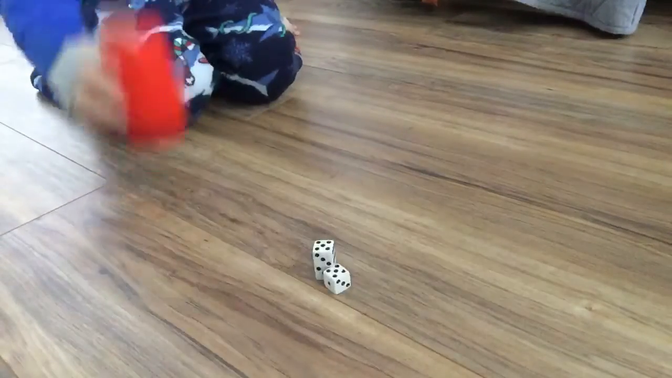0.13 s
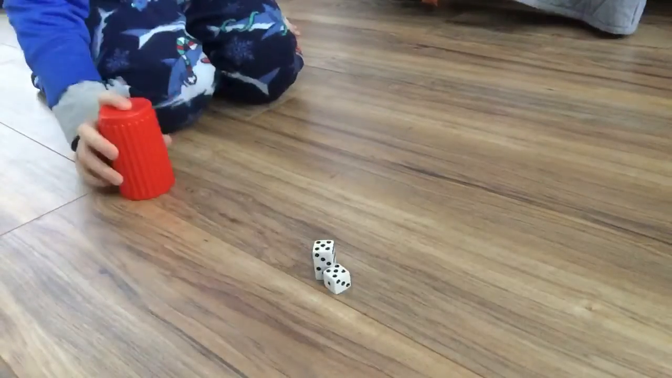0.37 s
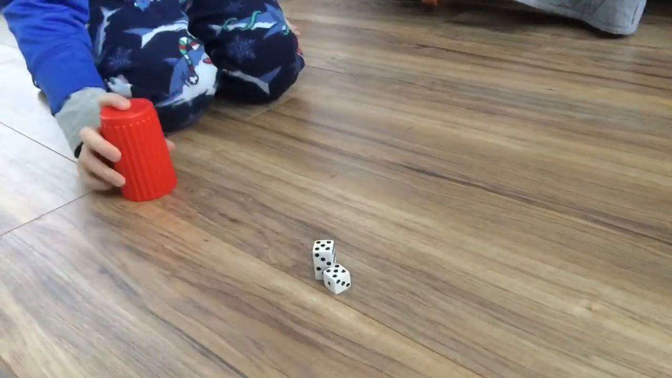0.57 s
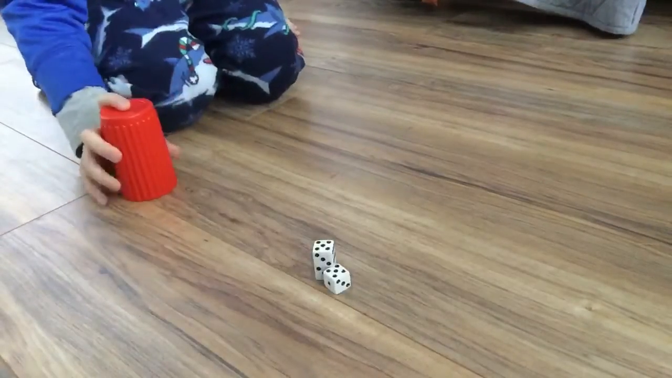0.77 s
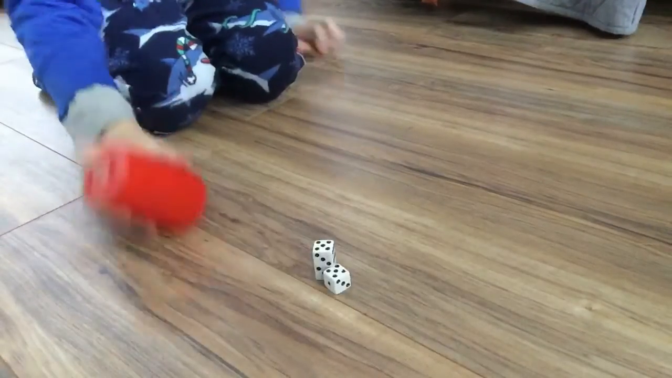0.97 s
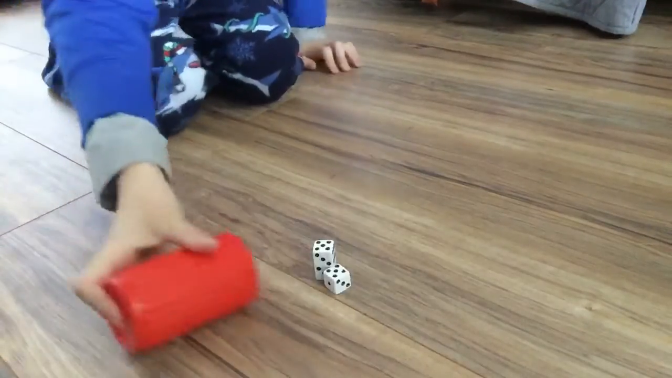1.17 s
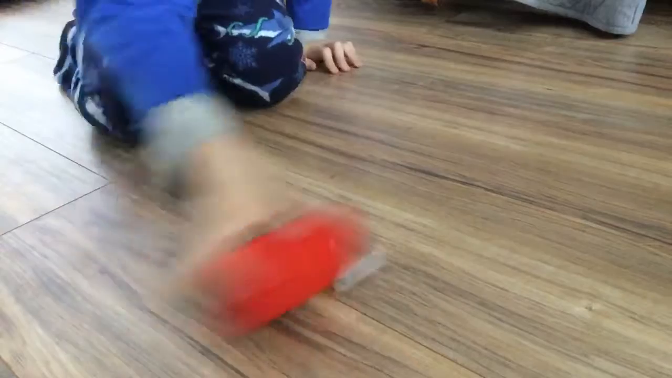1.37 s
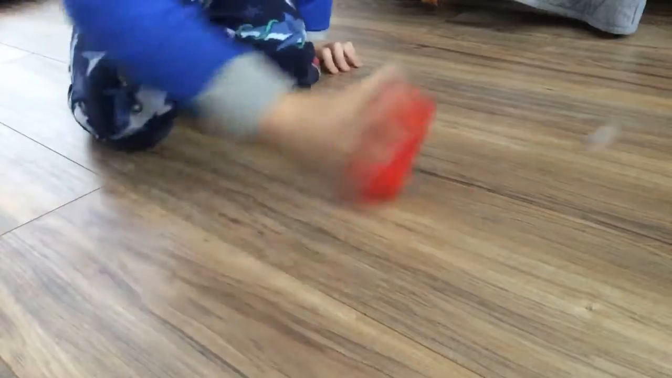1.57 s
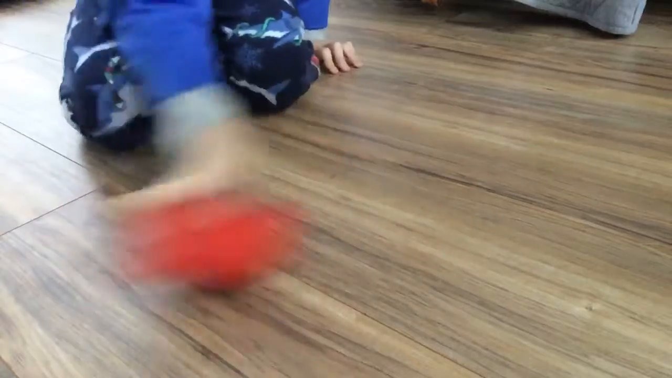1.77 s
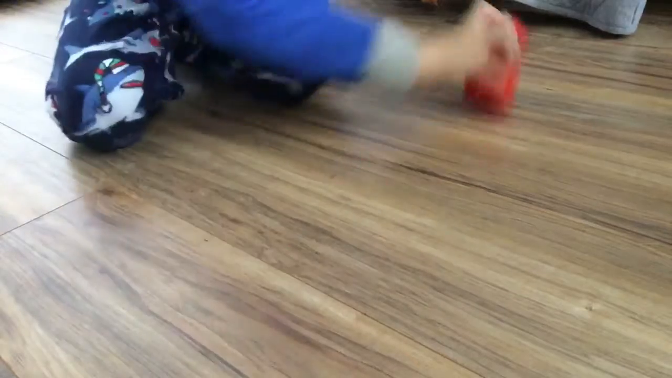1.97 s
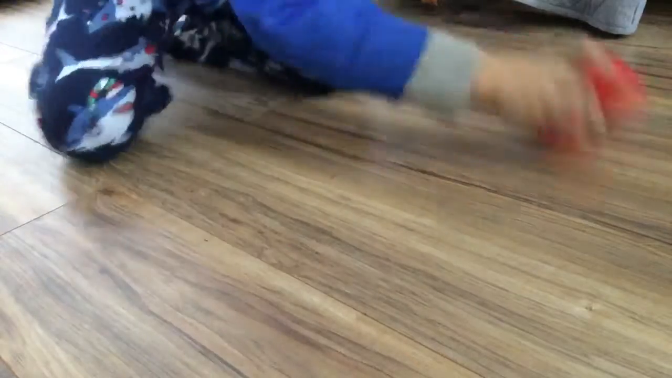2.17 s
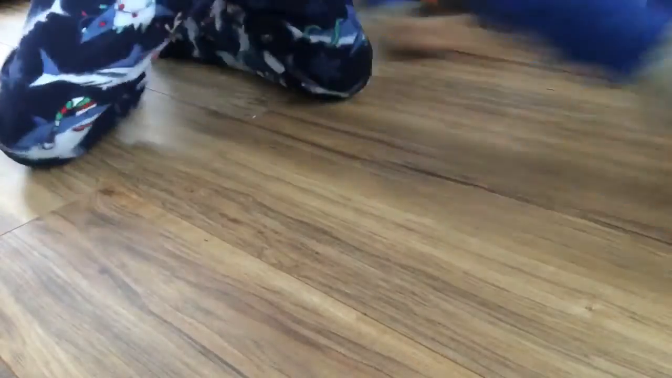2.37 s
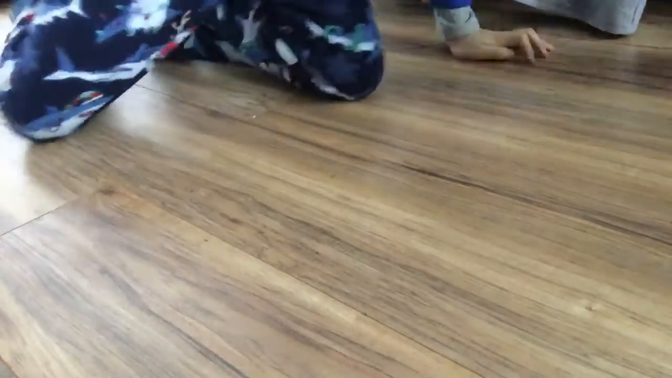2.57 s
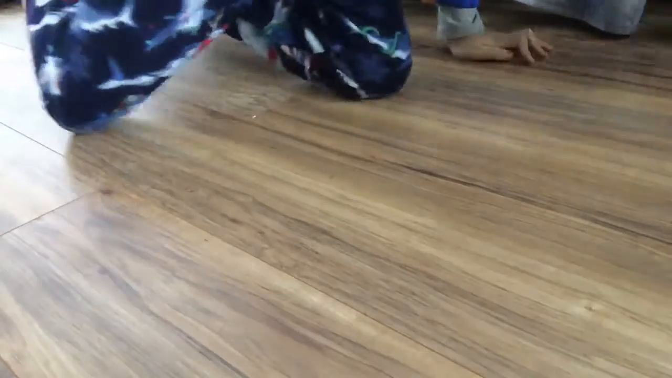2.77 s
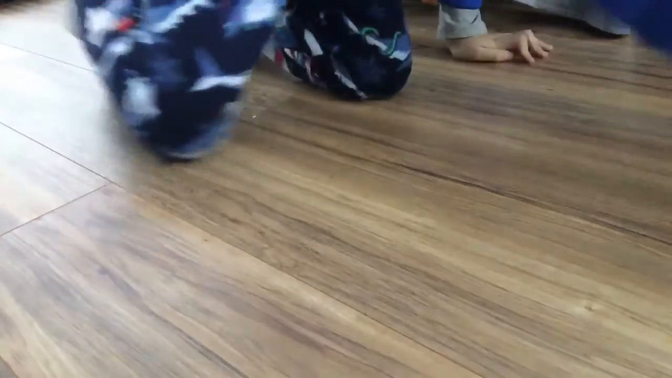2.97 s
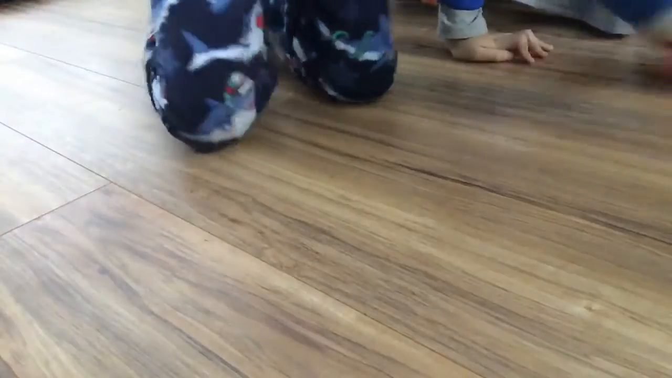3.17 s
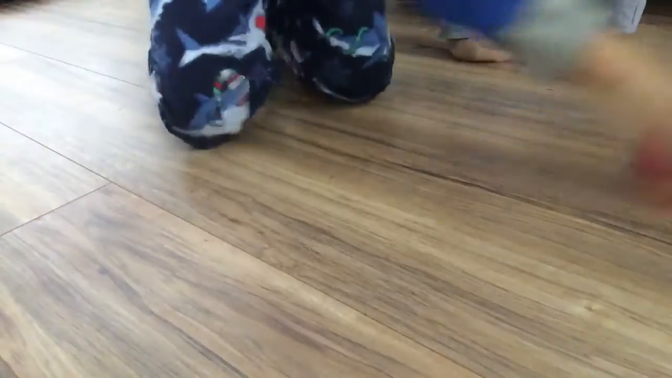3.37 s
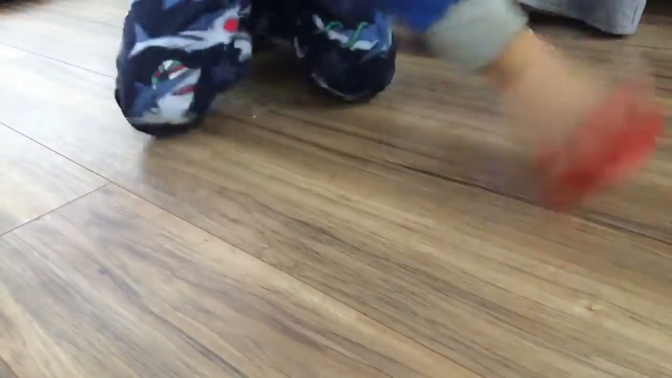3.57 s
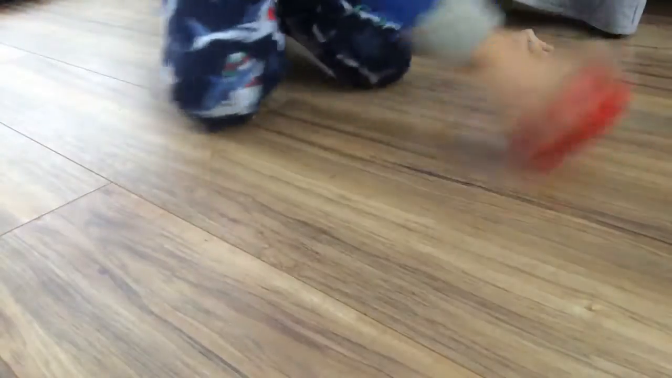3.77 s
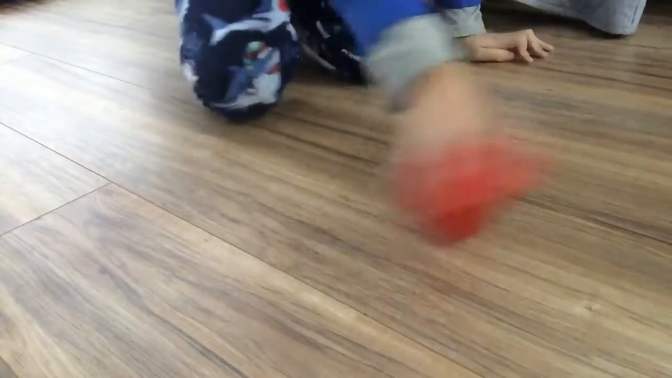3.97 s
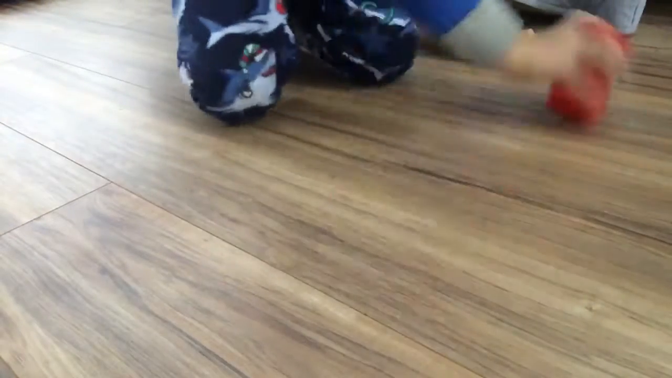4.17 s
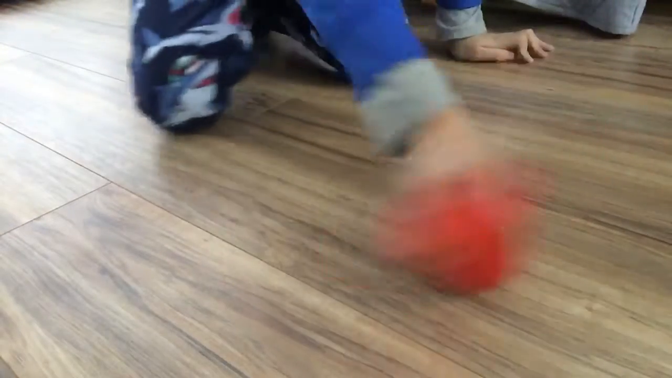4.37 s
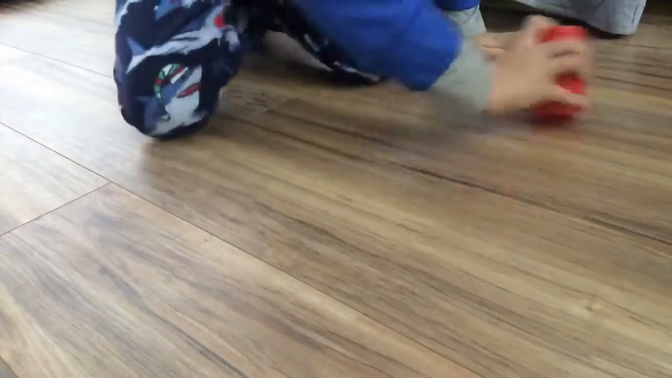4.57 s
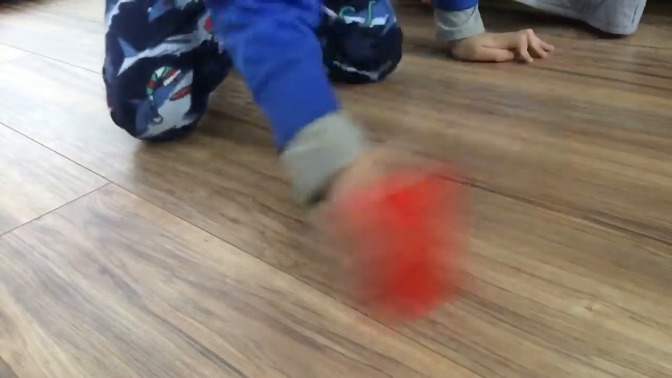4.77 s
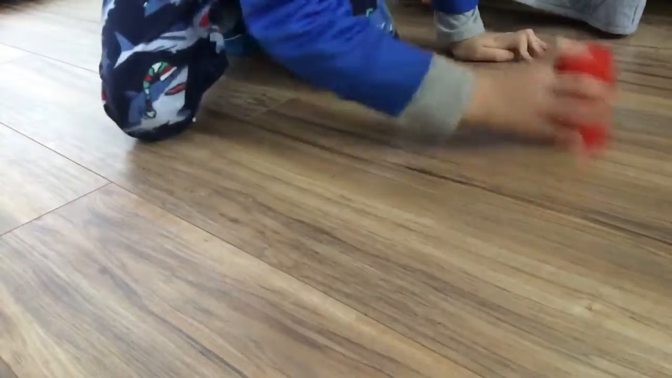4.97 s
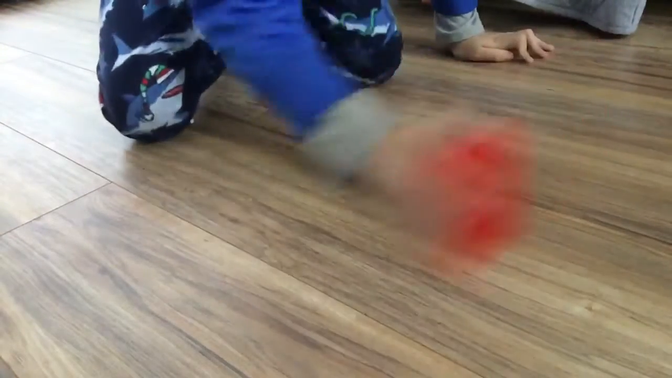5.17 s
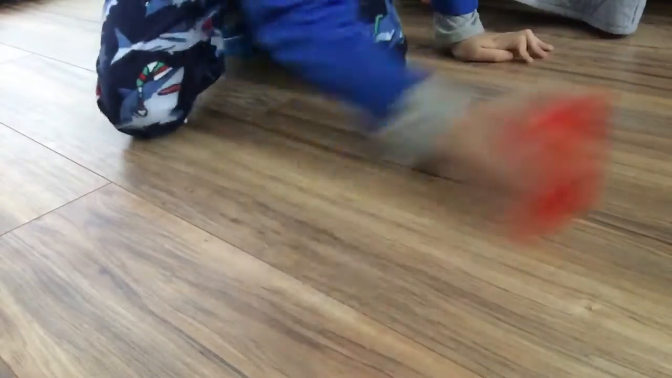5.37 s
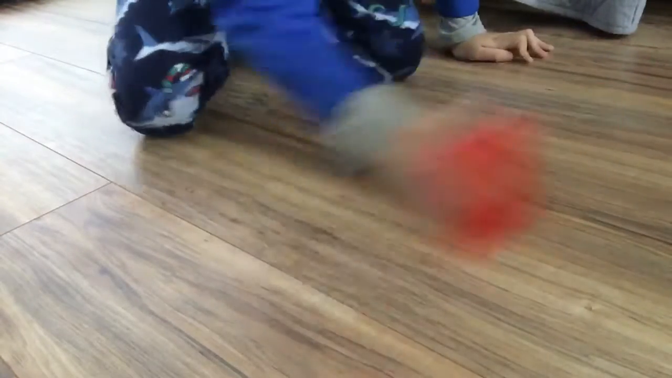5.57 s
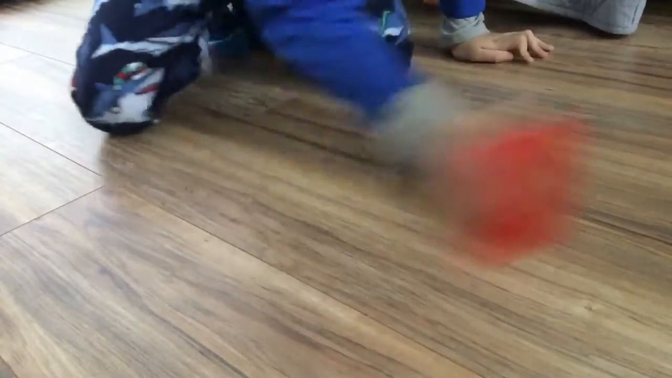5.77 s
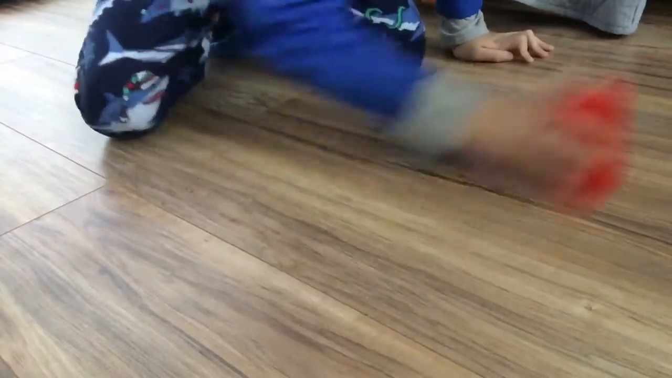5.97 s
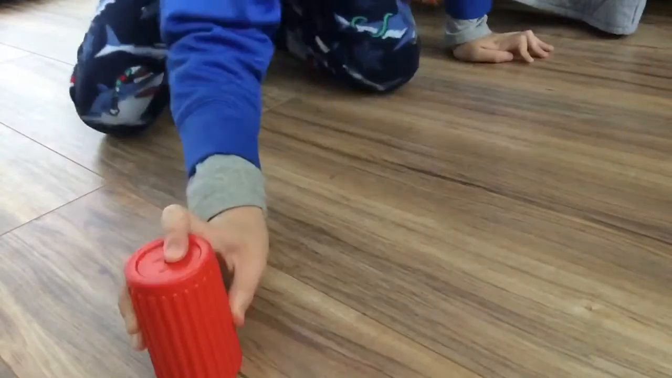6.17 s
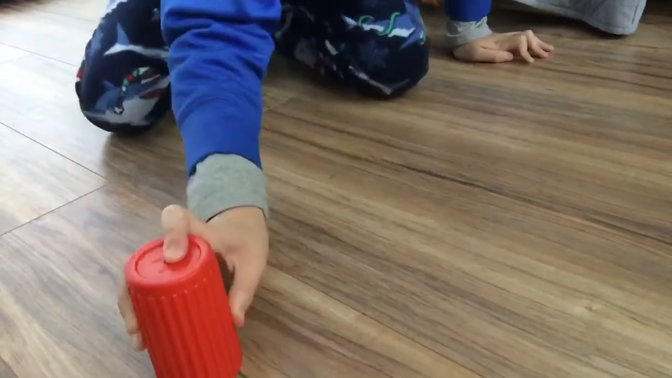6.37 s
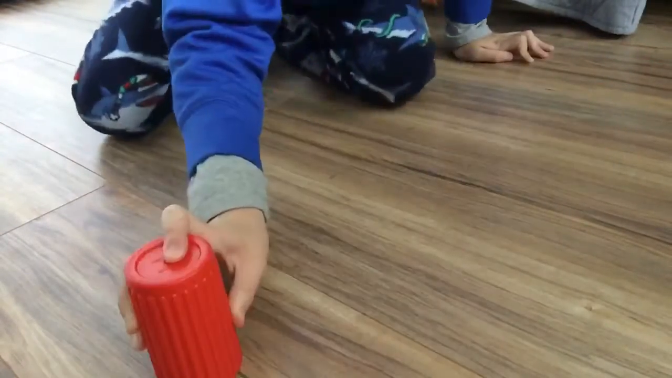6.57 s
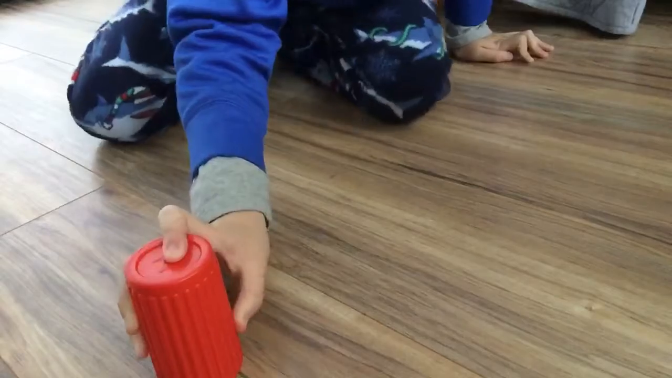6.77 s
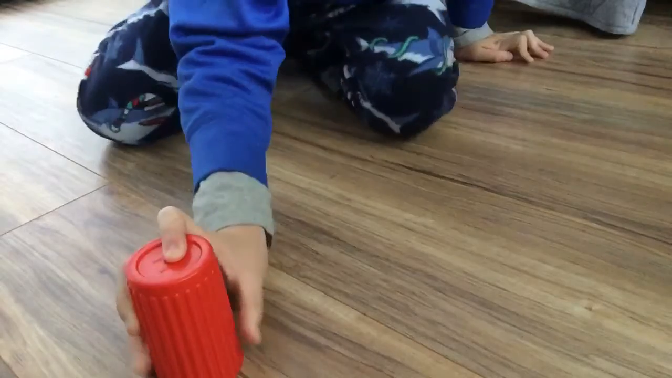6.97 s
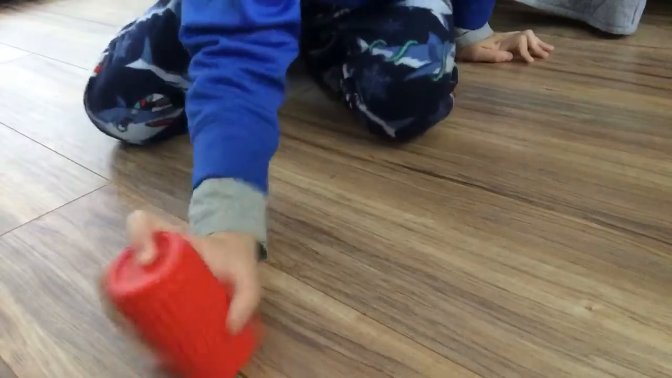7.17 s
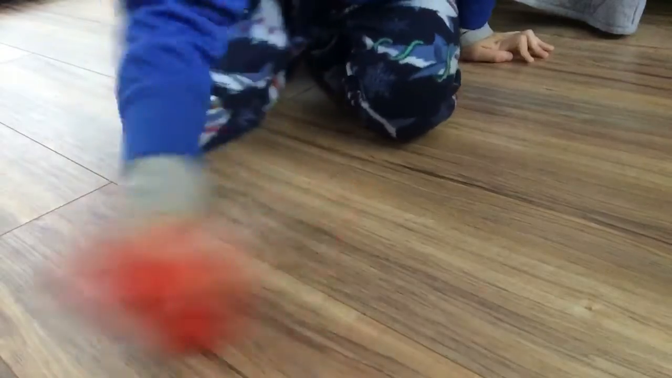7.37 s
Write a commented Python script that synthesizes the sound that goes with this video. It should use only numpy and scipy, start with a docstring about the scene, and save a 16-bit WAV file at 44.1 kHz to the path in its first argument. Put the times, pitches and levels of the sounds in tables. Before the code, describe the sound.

Close in a small quiet room, a hollow plastic cup knocks on floorboards. After a pause it slides lightly, then snaps up dice with a hard click. Rapid back-and-forth strokes follow, scraping, hissing and hooting hollowly while dice whirl against the plastic wall, with knocks at the turns. The cup stops, dice clatter together, near silence follows, and a new sweep begins.

```python
"""A wooden floor in a small room: an upturned plastic cup is swept to and fro and scoops up dice.
Its rim scrapes, hisses and rumbles on the boards: tiny random impacts, coloured and driven by the strokes.
Dice whirl round the wall (impacts ringing their modes) and the air inside hoots (modes gliding in pitch).
Floor knocks and dice hits ring floor, air, wall and dice, with a crack of noise.
The cup stops, the dice clatter into a stack, and it sets off again; decaying noise forms the room's answer."""
import sys
import numpy as np
from scipy import signal
from scipy.fft import rfft, irfft, next_fast_len
from scipy.io import wavfile
from scipy.ndimage import uniform_filter1d, map_coordinates

SR = 44100
rng = np.random.default_rng(int(sys.argv[2]) if len(sys.argv) > 2 else 0)


def to_wav(s):
    """Save 16-bit WAV."""
    ch = np.atleast_2d(s).T  # columns
    pcm = np.round(np.clip(ch, -1, 1) * 32767)  # PCM
    wavfile.write(sys.argv[1], SR, pcm.astype(np.int16))


N = 327663


def amp(db):
    """Decibels to gain."""
    return 10 ** (np.asarray(db) / 20)


def unit(x):
    """Scale to rms 1."""
    return x / np.sqrt(np.mean(x ** 2) + 1e-20)


def burst(x):
    """Scale a short sound to the energy of 20 ms at rms 1."""
    return x * np.sqrt(0.02 * SR / np.sum(x ** 2))


def along(points, hz):
    """Interpolate (Hz, value) points on a log frequency axis."""
    point_hz, values = np.transpose(points)
    return np.interp(np.log(hz + 1), np.log(point_hz + 1), values)


def wobble(rate):
    """A smooth random curve, rate knots a second."""
    knots = rng.standard_normal(int(N * rate / SR) + 4)
    return map_coordinates(knots, [np.arange(N) * rate / SR])


def contacts(rate, spread_db):
    """Tiny random impacts, on average rate a second, of random sign and uneven size."""
    hits = rng.random(N) < rate / SR
    sign = rng.choice([-1, 1], N)
    return hits * sign * amp(spread_db * rng.standard_normal(N))


def filtered(x, response):
    """Multiply the spectrum of x by a complex response of frequency."""
    m = next_fast_len(len(x) + SR // 10)
    return irfft(rfft(x, m) * response(np.fft.rfftfreq(m, 1 / SR)), m)[:len(x)]


def coloured(x, spectrum):
    """Shape x with a smooth spectrum."""
    return filtered(x, lambda hz: amp(along(spectrum, hz)))


def skirts(hz, modes):
    """A body radiates little outside the range of its modes."""
    edges_hz = np.clip([modes[0][0] * 0.87, modes[-1][0] * 1.24], 20, SR / 2 - 1)
    band = signal.butter(2, edges_hz, 'band', fs=SR, output='sos')
    return signal.sosfreqz(band, hz, fs=SR)[1]


def ringing(x, modes):
    """Excite a body: a parallel bank of damped resonances, limited to its range."""
    def response(hz):
        bank = sum(amp(db) * 1j * hz * width / (centre * centre - hz * hz + 1j * hz * width)
                   for centre, width, db in modes)
        return bank * skirts(hz, modes)
    return filtered(x, response)


# Spectrum of the quiet room. Each row: frequency in Hz, relative level in dB.
QUIET_SPECTRUM = [(25, -19), (100, -7.5), (145, 9.5), (300, -8), (1000, -22.5), (4000, -33.5), (16000, -54)]


def quiet_room():
    """The faint steady noise of the room: coloured Gaussian noise."""
    return amp(-77.5) * unit(coloured(rng.standard_normal(N), QUIET_SPECTRUM))


# Decay of the room. Each row: frequency in Hz, time to fall 60 dB in seconds.
ROOM_DECAY = [(150, 0.3), (400, 0.2), (1000, 0.35), (4000, 0.36), (8000, 0.28), (15000, 0.17)]


def room(x, wet_db):
    """Add the room's answer: noise dying at its own speed per frequency, drawn afresh every 1/3 s."""
    out = np.pad(x, (0, SR))
    size = SR // 3  # samples per new tail
    for start in range(0, N, size):
        hz, t, noise = signal.stft(rng.standard_normal(SR // 2), SR, nperseg=256)
        decay = amp(-60 * t / along(ROOM_DECAY, hz)[:, None])
        tail = signal.istft(noise * decay, SR, nperseg=256)[1]
        tail[:round(0.005 * SR)] = 0  # gap before the first reflection
        echo = signal.fftconvolve(x[start:start + size], tail / np.linalg.norm(tail))
        out[start:start + len(echo)] += amp(wet_db) * echo
    return out[:N]


def mirrored(x, share, delay_s, swing, rate):
    """Add a bounce off floor and hand, whose path keeps changing at random."""
    lag_s = delay_s * np.exp(swing * wobble(rate))
    return x + share * map_coordinates(x, [np.arange(N) - SR * lag_s], order=3)


# Strokes of the cup, or parts of them, and one faint rustle of sleeve or hand near 6.7 s.
# Each row: start in seconds, length in seconds, share of the length at which it is fastest,
# top speed 0-1, force in dB, dice drive in dB over the force, air drive in dB over the force.
STROKES = [(0.847, 0.087, 0.71, 0.1, -73.5, -15, 9.5), (0.931, 0.11, 0.42, 0.77, -53, 4, 8),
           (1.119, 0.138, 0.22, 0.3, -38, -5.5, -0.5), (1.256, 0.3, 0.1, 0, -48.5, -15, 4.5),
           (1.463, 0.271, 0.25, 0.5, -26, 1, -3.0), (1.733, 0.12, 0.6, 0.69, -27.5, -1.5, 2.5),
           (1.872, 0.17, 0.71, 0.55, -24.0, 1.5, -4.5), (2.051, 0.13, 0.29, 0.8, -29.5, 4.5, 6),
           (2.196, 0.075, 0.51, 0.2, -36.0, -7, 8.5), (2.268, 0.167, 0.41, 0.9, -30.5, 1, -0.5),
           (2.448, 0.29, 0.27, 0.6, -29.5, 1.5, -2.5), (2.74, 0.075, 0.3, 0.5, -39.5, 5, -15),
           (2.814, 0.181, 0.85, 0.44, -31.5, 0.5, 8), (2.993, 0.34, 0.13, 0.71, -31, 0.5, 4.0),
           (3.293, 0.099, 0.36, 0.67, -27, -2.0, 0.5), (3.399, 0.25, 0.72, 0.6, -27, -2, 1.5),
           (3.632, 0.105, 0.29, 0.35, -28.5, -1.5, 3), (3.735, 0.12, 0.48, 0.75, -30.0, -1.5, 2.5),
           (3.862, 0.075, 0.5, 0.2, -35.0, 0, 8), (3.936, 0.19, 0.4, 0.6, -28.5, -4, 2.5),
           (4.127, 0.242, 0.45, 0.74, -28.5, 2.5, 1), (4.376, 0.11, 0.44, 0.74, -24.5, -2, -1),
           (4.508, 0.23, 0.71, 0.4, -27.5, -2, 3.5), (4.745, 0.21, 0.76, 0.96, -27.0, 5.5, -7.5),
           (4.965, 0.26, 0.56, 0.73, -27.5, 2.0, -5), (5.187, 0.23, 0.5, 0.88, -27.5, 3.5, -3.5),
           (5.414, 0.2, 0.85, 0.5, -26.5, 2.5, -3.5), (5.617, 0.25, 0.84, 0.8, -26.5, 5.0, -3),
           (5.84, 0.24, 0.5, 0.7, -28, 3.5, -1.5), (6.066, 0.22, 0.75, 0.8, -24.5, 4, -7),
           (6.293, 0.17, 0.1, 0.1, -46, -2, -1), (6.71, 0.532, 0.41, 0.05, -68.5, -5.0, 9),
           (7.233, 0.063, 0.94, 0.1, -47, -19, 5), (7.284, 0.27, 0.35, 0.5, -29, 0.5, 9.5)]
TURN_S = 0.016  # blend of one row into the next
STROKE_POINT = 1.13  # 1 = sine arch, higher = more pointed


def strokes():
    """Each row speeds up and slows down: slowness 0-1, speed, drives of rim, dice and air."""
    controls = np.zeros((5, N + SR))
    controls[0] = 1
    for s, length_s, fastest, top_speed, force_db, dice_db, air_db in STROKES:
        u = np.linspace(0, 1, round(length_s * SR))
        phase = np.interp(u, [0, np.clip(fastest, 0.05, 0.95), 1], [0, 0.5, 1])
        arc = np.abs(np.sin(np.pi * phase)) ** STROKE_POINT
        start = round(s * SR)
        span = slice(start, start + len(u))
        controls[:2, span] = 1 - arc, top_speed * arc
        controls[2:, span] = amp([[force_db], [force_db + dice_db], [force_db + air_db]])
    return uniform_filter1d(controls, round(TURN_S * SR), axis=1)[:, :N]


# Spectrum of the boards. Each row: frequency in Hz, relative level in dB.
RUMBLE_SPECTRUM = [(30, -23.5), (110, -24.5), (175, -7), (250, 1.5), (330, 7), (420, -2), (520, -13.5),
                   (900, -43.5)]
BOARDS_MAX_DB = -46.5  # soft ceiling, before bumps and trim
BOARDS_SLOW_DB, BOARDS_SPEED_DB = 3, -13.5  # drive over the force at rest, change to full speed


def board_rumble(force, speed, bumpy_db=2.5):
    """Slow dragging shakes the heavy boards, fast sliding skims them; the rumble is bumpy."""
    drag = force * amp(BOARDS_SLOW_DB + BOARDS_SPEED_DB * speed)
    limited = drag / np.hypot(1, drag / amp(BOARDS_MAX_DB))
    boards = limited * amp(bumpy_db * wobble(28))
    return amp(-2) * boards * unit(coloured(contacts(rate=900, spread_db=3.0), RUMBLE_SPECTRUM))


# Spectrum of the fast rim. Each row: frequency in Hz, relative level in dB.
HISS_SPECTRUM = [(2000, -43.5), (5000, 2.5), (7000, 4), (9000, 4), (11500, 2), (14000, -2.5), (16000, -8.5)]
HISS_SPEED_DB = 17.5  # growth from rest to full speed


def rim_hiss(force, speed):
    """Dense tiny contacts of the rim hiss louder with speed."""
    hiss = force * amp(HISS_SPEED_DB * (speed - 1))
    return amp(1.0) * hiss * unit(coloured(contacts(rate=16000, spread_db=4.5), HISS_SPECTRUM))


# Spectrum of the rim on wood. Each row: frequency in Hz, relative level in dB.
SCRAPE_SPECTRUM = [(500, -50.5), (900, -3), (1100, 3.5), (1550, -1), (2000, 2.5), (2700, 2), (3400, -6.5),
                   (6000, -6.5), (12000, -41.5)]
SCRAPE_TURN_DB = 9.5  # sinks this far at a turn


def rim_scrape(force, slowness):
    """The rim catches on the wood grain; the scrape sinks as the cup turns round."""
    scrape = force * amp(-SCRAPE_TURN_DB * slowness)
    return amp(-1.09) * scrape * unit(coloured(contacts(rate=4000, spread_db=2.5), SCRAPE_SPECTRUM))


# Resonances of the dice. Each row: frequency in Hz, width in Hz, relative level in dB.
DICE_MODES = [(3290, 400, -0.5), (3820, 510, 0), (4136, 210, 6), (4606, 360, 1), (5060, 430, -1.5),
              (5400, 320, -1.5), (5920, 180, -5.5), (6500, 250, -5.5)]
DICE_TURN_DB = 10  # sinks this far at a turn


def whirl(drive, slowness, waver_db=3.0):
    """Dice pressed to the wall tick along it; as they tumble, one mode after another speaks up."""
    lowest_hz = DICE_MODES[0][0]
    sound = np.zeros(N)
    for hz, width_hz, db in DICE_MODES:
        # lasting contact broadens the modes and dulls the upper ones
        damped = (hz, width_hz * 3.0, db - 4.5 * np.log2(hz / lowest_hz))
        ticks = contacts(rate=900, spread_db=4.5)
        sound += amp(waver_db * wobble(35)) * ringing(ticks, [damped])
    return amp(-4.0 - DICE_TURN_DB * slowness) * drive * unit(sound)


# Pitch of the air in the cup, higher as the rim tilts up. Each row: time in seconds, pitch in Hz.
AIR_PITCH = [(0.4, 621), (1.0, 630), (1.5, 717), (1.8, 712), (2.6, 718), (2.9, 693), (3.4, 767), (3.9, 763),
             (4.35, 756), (4.65, 685), (4.9, 605), (5.3, 629), (5.65, 625), (5.95, 611), (6.5, 660),
             (7.4, 644)]


def air_pitch(seconds):
    """Pitch of the enclosed air in Hz: the rim's tilt opens the cavity."""
    return np.interp(seconds, *np.transpose(AIR_PITCH))


def cavity(pitch_hz, tilt_db=8.5):
    """Modes of the air (Hz, width Hz, dB); the two low ones fade as the rim lifts."""
    tilt = (pitch_hz - 600) / 100
    return [(435, 60, -7.0 - 1.0 * tilt_db * tilt),
            (555, 62, -1.5 - 0.84 * tilt_db * tilt),
            (pitch_hz, 72, 0)]


AIR_TURN_DB = 3.5  # sinks this far at a turn


def hoot(drive, slowness, flare_db=2.53):
    """Sliding stirs the air in the cup, which flares unevenly and glides in pitch with the tilt."""
    stir = contacts(rate=1600, spread_db=4.5)
    pitch_hz = air_pitch(np.arange(N) / SR)
    centres_hz, step_hz = np.linspace(540, 840, 7, retstep=True)
    air = np.zeros(N)
    for hz in centres_hz:  # crossfade between fixed cavities
        share = np.clip(1 - abs(pitch_hz - hz) / step_hz, 0, 1)
        air += share * ringing(stir, cavity(hz))
    return amp(-4.5 - AIR_TURN_DB * slowness + flare_db * wobble(22)) * drive * unit(air)


def strike(modes, t, chatter, peak_s):
    """A blow, then noisy chatter that swells and dies, rings modes of varied pitch and strength."""
    swell = t / peak_s * np.exp(1 - t / peak_s)
    blow = chatter * swell * rng.standard_normal(len(t))
    blow[0] += 1
    chance = rng.standard_normal((len(modes), 2)) * [0.02, 3]  # pitch share, dB
    varied = [(hz * (1 + detune), width, db + extra_db)
              for (hz, width, db), (detune, extra_db) in zip(modes, chance)]
    return burst(ringing(blow, varied))


# Resonances of the floor and the cup's wall. Each row: frequency in Hz, width in Hz, relative level in dB.
FLOOR_MODES = [(189, 12, -14), (250, 74, -3.5), (307.6, 110, 11)]
WALL_MODES = [(1110, 150, -14.5), (1270, 800, -1), (1400, 270, 0.5), (1823, 140, 1.5), (2036, 350, 6.5),
              (2340, 200, -1.5), (2800, 230, -16)]
# Spectrum of the crack. Each row: frequency in Hz, relative level in dB.
CRACK_SPECTRUM = [(300, -35), (1500, -7), (5000, 5), (7500, 3), (9500, 4.5), (12000, -2.5), (16000, -10.5)]


def knock(s, floor_db, air_db, wall_db, dice_db, crack_db):
    """A knock cracks, thumps floor, air and wall, and sets the dice buzzing against the plastic."""
    t = np.arange(SR // 8) / SR
    floor = amp(floor_db - 1.5) * strike(FLOOR_MODES, t, chatter=0.0055, peak_s=0.0026)
    air = amp(air_db - 1.5) * strike(cavity(air_pitch(s)), t, chatter=0.05, peak_s=0.004)
    wall = amp(wall_db - 1.0) * strike(WALL_MODES, t, chatter=0.08, peak_s=0.0033)
    dice = amp(dice_db - 1.5) * strike(DICE_MODES, t, chatter=0.15, peak_s=0.0051)
    snap = amp(-60 * t / 0.0019) + 0.5 * amp(-60 * t / 0.07)  # first contact, then a skid
    crack = amp(crack_db) * burst(coloured(rng.standard_normal(len(t)) * snap, CRACK_SPECTRUM))
    return floor + air + wall + dice + crack


def blend(mix, share):
    """Levels in dB part way between the two columns of a mix."""
    return np.dot(mix, [1 - share, share])


# Knocks on the floor, mostly of the rim, with a few low thuds, perhaps knees. Each row: start in seconds,
# strength in dB, hardness 0-1, thump of the boards in dB.
FLOOR_KNOCKS = [(0.3992, -20, 0.48, -39.5), (0.429, -30, 0.36, -41), (1.002, -41.5, 0.12, -67),
                (1.1197, -33, 0.58, -42.5), (1.443, -36, 0.68, -49), (1.679, -23.5, 0.6, -60.0),
                (1.952, -26.5, 0.83, -47), (2.112, -21.5, 0.8, -50), (2.408, -38.0, 0.21, -42.0),
                (2.444, -28, 0.31, -39), (2.616, -38, 0.1, -39.5), (2.7757, -27.5, 1.0, -59),
                (2.849, -22.5, 0.91, -37), (3.7904, -24.5, 0.86, -43.0), (3.889, -24, 0.27, -42),
                (4.313, -17, 0.4, -38.5), (4.542, -27.5, 0.58, -53), (4.763, -18.5, 0.77, -33.0),
                (5.652, -30.5, 0.82, -58.0), (6.919, -55, 0.3, -54), (7.3046, -23.5, 0.67, -60.0),
                (7.398, -29.5, 0.69, -46.0)]
# Rows for wall, dice, crack. Each row: level over the strength in dB if soft, in dB if hard.
FLOOR_KNOCK_MIX = [(-14.5, -1.5), (-22.5, -1.5), (-42, -6)]


def floor_knocks():
    """Knocks, mostly hollow, brighten with hardness."""
    out = np.zeros(N + SR)
    for s, db, hardness, thump_db in FLOOR_KNOCKS:
        # the air takes the full strength
        wall_db, dice_db, crack_db = db + blend(FLOOR_KNOCK_MIX, hardness)
        out[round(s * SR):][:SR // 8] += knock(s, thump_db, db, wall_db, dice_db, crack_db)
    return out[:N]


# Hits of the dice. Each row: start in seconds, strength in dB, place from 0 = flat on another die
# to 1 = on the cup's edge.
DICE_HITS = [(0.4065, -34, 0.32), (1.4943, -6.5, 0.1), (1.503, -21, 0.4), (1.535, -18.5, 0.83),
             (1.5684, -17, 0.89), (1.598, -21.5, 0.72), (1.638, -18, 0.04), (1.8832, -15, 1.0),
             (1.89, -27, 0.92), (3.1288, -14, 0.64), (3.14, -15, 0.79), (3.432, -21, 0.59),
             (4.8537, -7.5, 0.35), (4.861, -31, 0.57), (5.566, -17.5, 0.39), (6.437, -43, 0.55),
             (6.467, -16.5, 0.079), (6.512, -17, 0.3), (6.5268, -24, 0.73), (6.555, -15.5, 0.05),
             (6.61, -25, 0.02), (7.364, -16, 0.08)]
# Rows for floor, air, wall, dice, crack. Each row: level over the strength in dB on a die, in dB on the edge.
DICE_MIX = [(-25.5, -30.5), (-12, -21), (-15, -3.5), (-1.5, -10.5), (-27, -4)]


def dice_hits():
    """The dice click on each other and crack on the cup's edge."""
    out = np.zeros(N + SR)
    for s, db, place in DICE_HITS:
        out[round(s * SR):][:SR // 8] += knock(s, *(db + blend(DICE_MIX, place)))
    return out[:N]


def scene():
    """Quiet room, sliding and knocks, the same in both channels."""
    slowness, speed, force, dice_drive, air_drive = strokes()
    rim = board_rumble(force, speed) + rim_hiss(force, speed) + rim_scrape(force, slowness)
    rattle = rim + whirl(dice_drive, slowness)
    bounced = mirrored(rattle, share=0.37, delay_s=0.0016, swing=0.25, rate=7)
    sliding = bounced + hoot(air_drive, slowness)
    knocks = floor_knocks() + dice_hits()
    mono = quiet_room() + room(sliding, wet_db=-9) + room(knocks, wet_db=-4.5)
    return np.array([mono, mono])


TOP_HZ = 15950


def record(dry, bass_cut_hz=140):
    """The microphone drops the bass, peaks squash near full scale, the end fades, the top is cut."""
    bass_cut = signal.butter(3, bass_cut_hz, 'high', fs=SR, output='sos')
    thin = signal.sosfilt(bass_cut, dry)
    squashed = thin / (1 + thin ** 6) ** (1 / 6)
    faded = squashed * np.minimum(1, np.arange(N)[::-1] / (0.006 * SR))
    return np.array([filtered(x, lambda hz: hz < TOP_HZ) for x in faded])


dry = scene()
out = record(dry)
to_wav(out)
```